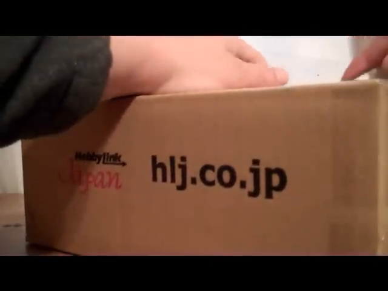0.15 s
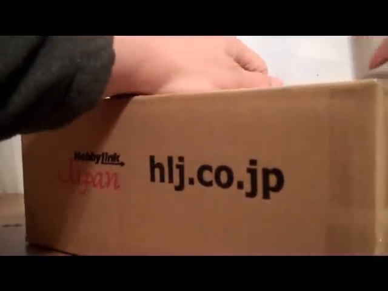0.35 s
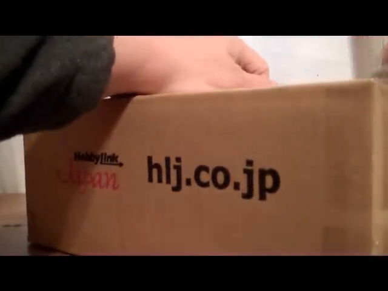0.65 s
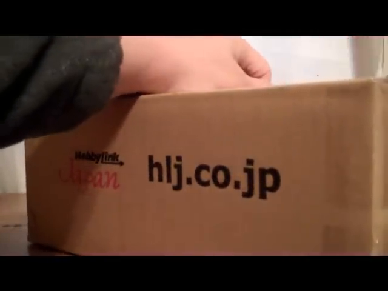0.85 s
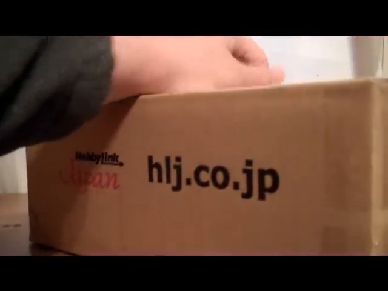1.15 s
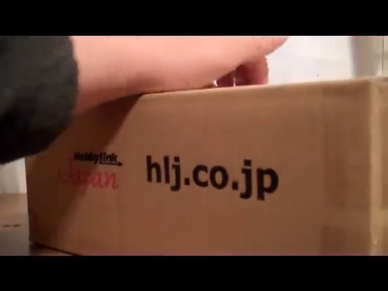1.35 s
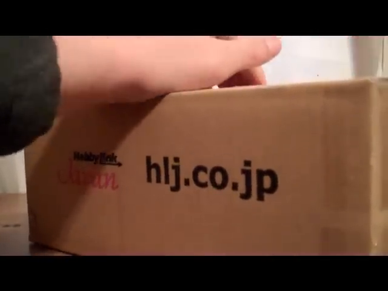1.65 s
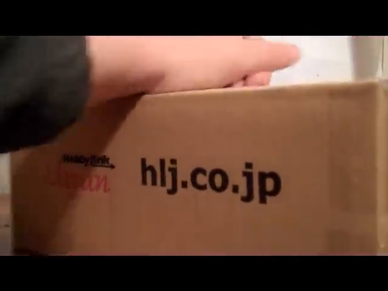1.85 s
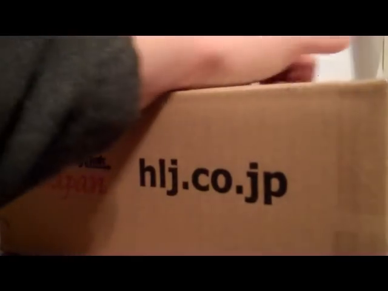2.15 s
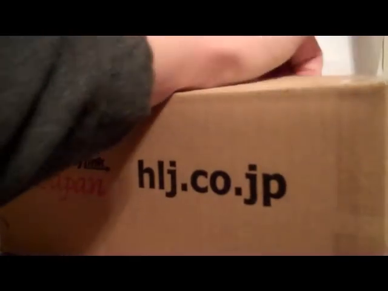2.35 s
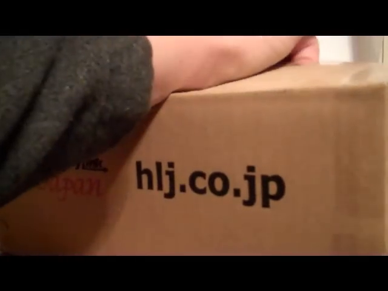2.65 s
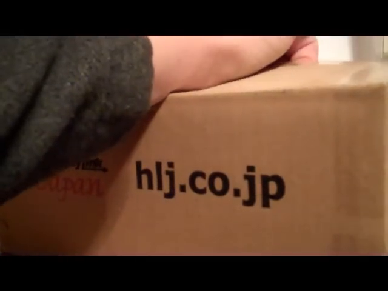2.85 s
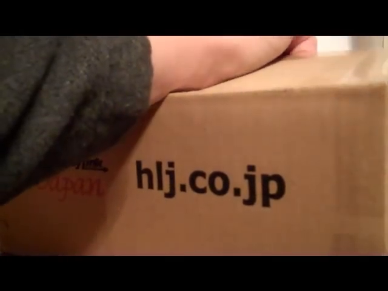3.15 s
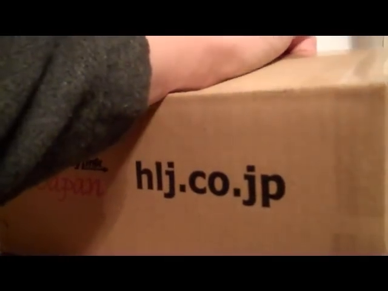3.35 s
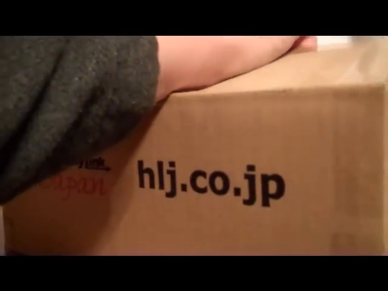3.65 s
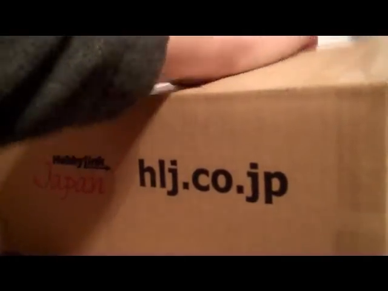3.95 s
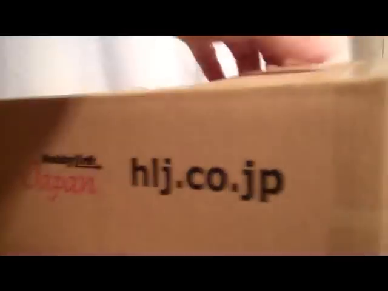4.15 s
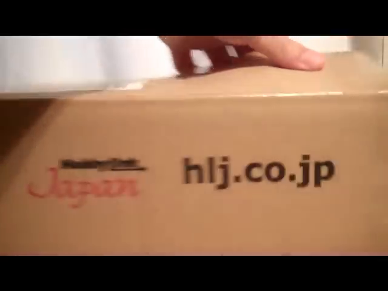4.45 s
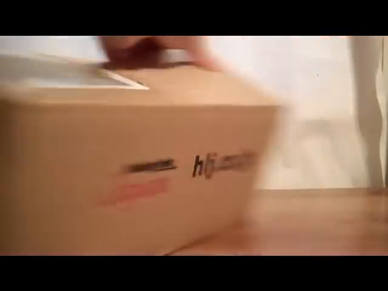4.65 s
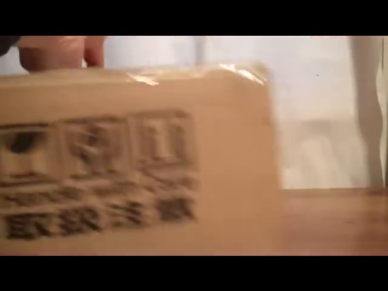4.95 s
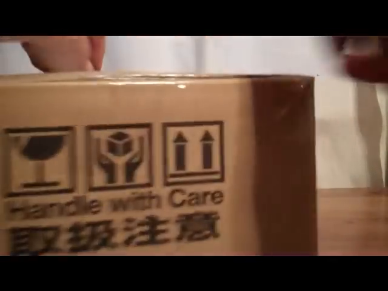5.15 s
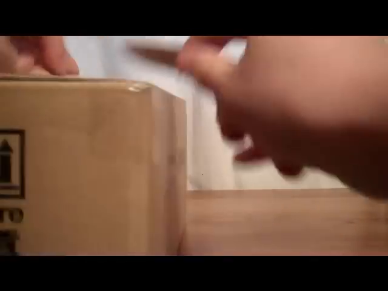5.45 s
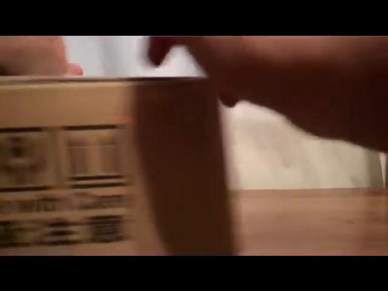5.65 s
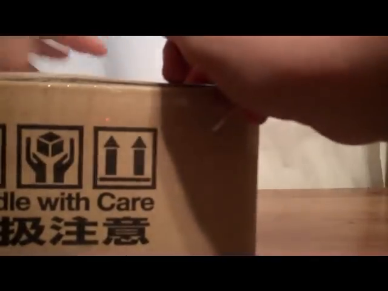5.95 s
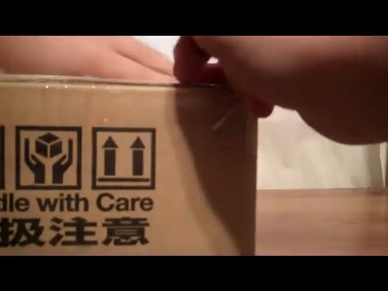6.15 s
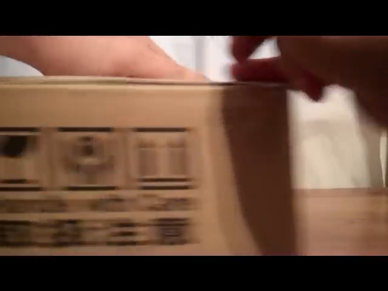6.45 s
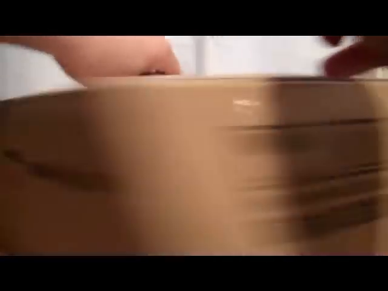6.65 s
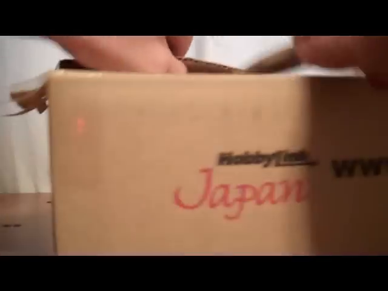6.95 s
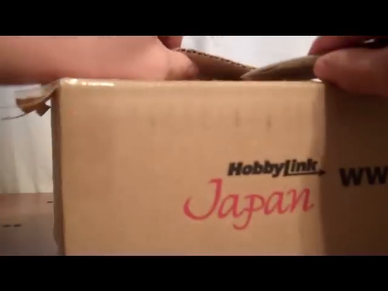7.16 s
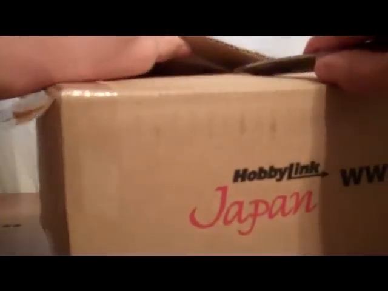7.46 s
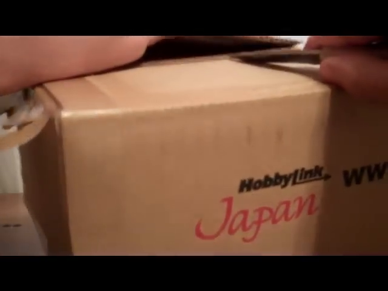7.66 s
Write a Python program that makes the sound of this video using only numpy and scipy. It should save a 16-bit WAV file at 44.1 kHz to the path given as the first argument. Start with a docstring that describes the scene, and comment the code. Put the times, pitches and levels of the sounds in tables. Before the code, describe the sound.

Close, dry cardboard handling: gritty hand rubs, sharp crackling tape snaps and rips, then a hollow box thump as the carton is turned.

```python
"""Hands slit, rub and peel tape on a cardboard box, then turn the box on a table, close to a small camera.
Rubbing is a dense rain of tiny random slips: a gritty hiss that also shakes the flaps, panels and cavity.
Tape snaps are cracks of noise that knock the box; bumps ring its air and panels with a short rattle.
One brief run of squeaks glides in partials; faint room noise lies behind. Two microphone ports listen."""
import sys
import numpy as np
from scipy import signal
from scipy.fft import rfft, irfft, next_fast_len
from scipy.io import wavfile
from scipy.ndimage import uniform_filter1d, map_coordinates

SR = 44100
rng = np.random.default_rng(int(sys.argv[2]) if len(sys.argv) > 2 else 0)


def waveform_to_disk(signal):
    """Save audio, clipped to [-1, 1], as 16-bit WAV at the path in sys.argv[1]."""
    frames = np.transpose(np.atleast_2d(signal))
    scaled = np.clip(frames, -1, 1) * 32767
    samples = np.round(scaled).astype(np.int16)
    wavfile.write(sys.argv[1], SR, samples)


N = 343912

# Resonances of the box. Each row: frequency in Hz, width in Hz at ring factor 1, relative level in dB.
# Taped flaps.
FLAP_MODES = [(1707, 302, -1), (2290, 365, 2.5), (2652, 237, 0.5), (2920, 382, -0.5), (3770, 570, -9.5)]
# Side panels, same columns.
PANEL_MODES = [(676, 140, -2), (869.5, 146, 7.5), (1147, 95, 3), (1356, 198, 7)]
# Air and floor of the box, same columns.
CAVITY_MODES = [(246, 127, 4), (134.5, 52, -15.5), (362.6, 127, 15)]


def amp(db):
    """Amplitude factor of a level in dB."""
    return 10 ** (np.asarray(db, float) / 20)


def evened(x):
    """Scales a signal to an RMS of 1."""
    return x / np.sqrt(np.mean(x ** 2) + 1e-20)


def read(points, hz):
    """Reads a spectral curve, straight between its points on a log-frequency axis."""
    f, value = np.transpose(points)
    return np.interp(np.log(hz + 1), np.log(f + 1), value)


def over_time(points):
    """Reads a curve of (seconds, value) at every sample."""
    return np.interp(np.arange(N) / SR, *np.transpose(points))


def shaped(x, gain):
    """Applies gain(Hz) to the whole spectrum."""
    size = next_fast_len(x.shape[-1])
    spectrum = rfft(x, size) * gain(np.fft.rfftfreq(size, 1 / SR))
    return irfft(spectrum, size)[..., :x.shape[-1]]


def wander(count, samples):
    """Slow random drift of RMS 1: noise averaged twice over a few samples."""
    noise = rng.standard_normal(count)
    return evened(uniform_filter1d(uniform_filter1d(noise, samples), samples))


def add(mix, s, sound):
    """Adds a sound to the mix from s seconds on."""
    part = mix[..., max(round(s * SR), 0):][..., :sound.shape[-1]]
    part += sound[..., :part.shape[-1]]


def ring(modes, slope_db=0., longer=0.64, size=3000):
    """Impulse response of decaying modes, peak 1; modes swing opposite ways by turns in list order; width sets
    the decay."""
    t = np.arange(size) / SR
    out = np.zeros(size)
    for k, (hz, width, db) in enumerate(modes):
        level = amp(db - slope_db * np.log2(hz / 300))
        decay = np.exp(-np.pi * width * t / longer)
        out += (-1) ** k * level * decay * np.sin(2 * np.pi * hz * t)
    return out / abs(out).max()


def pressure():
    """Each stroke rises, holds and falls; overlapping strokes add in power, in hiss, flap, panel, cavity."""
    # Strokes of hand, blade and tape; the long early one is a hand resting on the box almost throughout.
    # Each row: full strength from in seconds, held in seconds, seconds to rise 20 dB, seconds to fall 20 dB,
    # then surface hiss, flap buzz, panel drone and cavity rumble in dB.
    strokes = [(0.0, .05, .05, .05, -56, -57, -62, -59), (.01, 7.5, .05, .15, -62, -68, -75, -75),
               (.102, .065, .07, .045, -40, -46, -46, -51), (.285, .115, .05, .045, -37.5, -46, -53, -53),
               (.535, .028, .055, .026, -41, -49, -53, -60), (.69, .06, .06, .045, -31, -45, -50, -51),
               (.795, .015, .03, .035, -48, -60, -66, -66), (.862, .038, .035, .045, -40, -54, -58, -54),
               (1.036, .062, .027, .034, -38, -48, -52, -54), (1.171, .066, .045, .11, -49, -52, -54, -58),
               (1.385, .005, .22, .22, -36, -44, -49, -50), (1.49, .09, .11, .06, -46, -60, -60, -64),
               (1.924, .005, .16, .14, -28, -41, -46, -52), (2.14, .045, .12, .11, -26, -42, -47, -54),
               (2.36, .03, .4, .11, -43, -51, -57, -58), (2.436, .03, .09, .13, -34, -43, -41, -46),
               (2.572, .096, .13, .14, -36, -47, -52, -60), (2.971, .042, .21, .11, -45, -56, -57, -56),
               (3.075, .005, .065, .09, -26, -32, -30.5, -43), (3.11, .045, .05, .022, -37, -41, -38, -44),
               (3.227, .003, .05, .17, -41, -42.5, -39.5, -51),
               (3.405, .042, .035, .035, -25.5, -31, -31, -40),
               (3.606, .07, .28, .05, -38.5, -42, -43, -49), (3.695, .004, .012, .034, -19, -18, -25, -34),
               (3.8, .045, .11, .05, -52, -56, -58, -54), (3.862, .012, .012, .043, -27, -41, -44.5, -56),
               (4.081, .003, .17, .11, -33, -39, -43.5, -50), (4.225, .11, .04, .11, -40, -45, -48, -53),
               (4.392, .003, .17, .05, -36, -41, -48, -53), (4.427, .004, .03, .045, -27, -38, -50, -58),
               (4.46, .243, .09, .12, -32.5, -47, -51, -55),
               (4.867, .003, .125, .085, -33, -41.5, -46, -42), (4.95, .25, .11, .11, -44.5, -52, -52, -54),
               (5.288, .003, .17, .18, -33, -37, -41, -48), (5.52, .004, .04, .04, -41, -50, -48, -54),
               (5.378, .06, .05, .11, -42.5, -47, -46, -45),
               (5.569, .003, .19, .18, -38.5, -41.5, -48.5, -51.5),
               (5.685, .075, .21, .04, -41.5, -50, -51, -59), (5.82, .09, .06, .04, -50, -60, -60, -60),
               (5.935, .034, .04, .012, -45, -54.5, -52, -55), (6.03, .098, .012, .11, -46, -53, -50, -59),
               (6.188, .003, .12, .125, -33.5, -43, -47, -51.5),
               (6.294, .003, .21, .42, -41, -48, -50, -54), (6.485, .09, .11, .21, -36, -46, -45, -55),
               (6.697, .082, .19, .21, -29, -37, -42, -52), (6.83, .12, .11, .15, -35, -43, -52, -57),
               (7.0, .04, .11, .12, -41, -47, -44, -46), (7.21, .003, .29, .26, -43.5, -56, -51.5, -60),
               (7.355, .003, .11, .45, -51, -56, -57, -59), (7.738, .003, .022, .06, -63, -62, -73, -68)]
    edge_bend = 1.15  # above 1 the edges of a stroke round into a dome
    t = np.arange(0, N / SR + .002, .002)
    s, held, rise, fall, *dbs = np.transpose(strokes)[..., None]
    before = np.maximum(s - t, 0) / rise
    after = np.maximum(t - s - held, 0) / fall
    below_db = 20 * (before + after) ** edge_bend
    levels = [np.sqrt((amp(db - below_db) ** 2).sum(axis=0)) for db in dbs]
    return [np.interp(np.arange(N) / SR, t, level) for level in levels]


def slips(per_s, spread_db, clump_db):
    """Random stick-slip clicks of uneven size in clumps of a few ms; three paths with unrelated signs."""
    size = amp(spread_db * np.minimum(rng.exponential(1, N), 5))
    size = size * (rng.random(N) < per_s / SR)
    clumps = amp(clump_db * wander(N, 150))
    return evened(size * clumps * rng.choice([-1., 1.], (3, N)))


def rubbing():
    """Fine slips hiss on the surface; coarser slips drive flaps, panels and cavity; the colour wanders."""
    # Dry skin and blade on paper. Each row: frequency in Hz, relative density in dB per Hz.
    hiss_curve = [(1470, -41), (2500, -14.5), (2890, -14.5), (3970, -9), (4320, -9), (4750, -7),
                  (5180, -8.5), (6470, -3.0), (8040, -2.0), (10700, -20.5), (14000, -24.5), (14500, -92)]
    # Glue crackles most while tape is peeled. Each row: time in seconds, strength of the ticks as a factor.
    peel = [(0, .2), (2.25, 0.12), (2.35, 0.49), (3.7, 0.72), (4.0, 0.17), (7.3, 0.23), (7.6, 0.63),
            (7.8, 1)]
    # Top treble of the rubbing, fading in from 9 to 11 kHz. Each row: time in seconds, gain in dB.
    sheen = [(0, -4), (.9, -1.5), (1.7, -1), (2.8, 0.5), (4.6, 2), (5.2, 0.5), (6, 5), (7.1, -1.5),
             (7.8, 5)]
    hiss, flap, panel, cavity = pressure()
    fine = slips(per_s=16000, spread_db=1.0, clump_db=1.2)
    coarse = slips(per_s=5000, spread_db=0.0, clump_db=2.0)

    # Fibres and glue let go now and then; each tick lasts about 1 ms.
    ticks = slips(per_s=150, spread_db=3.5, clump_db=5.0) * over_time(peel)
    burst = rng.standard_normal((3, 60)) * np.exp(-np.arange(60) / 13.6) / 3
    fine = fine + signal.oaconvolve(ticks, burst, axes=1)[:, :N]
    coarse = coarse + 0.6 * ticks

    out = hiss * evened(shaped(fine, lambda hz: amp(read(hiss_curve, hz))))
    for level, modes in ((flap, FLAP_MODES), (panel, PANEL_MODES), (cavity, CAVITY_MODES)):
        shaken = signal.oaconvolve(coarse, ring(modes)[None], axes=1)[:, :N]
        out += level * evened(shaken)

    hz, t, z = signal.stft(out, SR, nperseg=256)
    top = np.clip((hz - 9000) / 2000, 0, 1)
    z = z * amp(np.outer(top, np.interp(t, *np.transpose(sheen))))
    # Patches of time and frequency drift up and down together in all three paths.
    patches = uniform_filter1d(rng.standard_normal(z.shape[1:]), 5, axis=0)
    patches = evened(uniform_filter1d(patches, 25, axis=1))
    return signal.istft(z * amp(1.7 * patches), nperseg=256)[1][:, :N]


def snaps():
    """Tape lets go in a short crack, bright or dull, with a rattling tail; it also knocks flaps and panels."""
    # Tape snaps. Each row: start in seconds, crack peak in dB, brightness in dB per octave,
    # flap level in dB, panel level in dB.
    events = [(0.122, -24, 3, -30, -40), (0.1518, -16.5, 3, -20, -49), (.167, -11, -1, -16, -54),
              (0.4168, -28, 7, -40.5, -48), (.4443, -51, 0, -42, -38.5), (.624, -28, -3, -50, -41),
              (.668, -17, -6, -35, -51), (.814, -29, 6, -50, -56), (0.8371, -27, -3, -38, -67),
              (.9855, -28.5, -7, -46, -39), (1.2065, -24.5, -18, -30, -39), (1.7402, -27, -2, -45, -35),
              (1.7587, -15, -3.5, -46, -56), (1.933, -12, 2, -36, -36), (1.9422, -17, -5, -21, -25),
              (1.982, -0.5, -3.5, -28, -11), (1.9916, -24, 0, -23, -21), (2.0042, -7.5, -2.5, -14, -24),
              (2.242, -18, -1, -41, -46), (2.2862, -24.5, -7, -46, -34), (2.306, -23, -3, -48.5, -56.5),
              (2.3421, -8, 6.5, -14, -50), (2.415, -17, 10, -37, -46), (2.4404, -19, 2, -36, -37),
              (2.4511, -1.5, 4, -4, -11.5), (2.5375, -16.5, 13, -38, -49), (2.559, -12.5, 11, -16.5, -25.5),
              (2.585, -17, 3, -38, -48), (2.623, -19, 10, -43, -47), (2.775, -18, 7.5, -54, -66),
              (2.8712, -32, 6, -59, -65), (2.954, -27, 15, -23, -58.5), (3.022, -29, 4, -40, -48),
              (3.0402, -21, 4.5, -38.5, -46), (3.0635, -9, 15, -13, -39), (3.072, 0, -1, -0.5, -23),
              (3.1537, -29, 12, -39, -28), (3.1993, -29, 10, -38.5, -44), (3.2168, -11.5, 10, -15, -22),
              (3.38, -38, 8, -43, -36), (3.3955, -12.5, 10, -39, -30), (3.401, -17, 4, -21, -19),
              (3.408, -20, 5, -30, -16), (3.4296, -7.5, 7, -28, -10.5), (3.5125, -23, -6, -42, -26.5),
              (3.5641, -21.5, -17, -33.5, -20), (3.6442, -16, 7, -30, -29), (3.691, -12, 6, -32, -36),
              (3.7, -6, 5, -15, -11), (3.7121, -20, -6, -37, -24), (3.7164, -18, -3, -38, -36),
              (3.8593, -20, -22, -47, -53), (3.8685, -33, 14, -14, -52), (3.938, -21, 10, -49, -54),
              (4.15, -35, 0, -49, -48), (4.3076, -23, 4, -47, -48), (4.4261, -9.5, -1.5, -14.5, -36),
              (4.4781, -12, 6, -39, -53), (4.704, -16.5, 9, -44, -48), (4.8527, -16, 11, -28, -21),
              (4.9272, -22, -5, -46, -29), (5.3709, -18, 2, -7, -9), (5.674, -22, -2, -51, -29),
              (6.197, -15.5, -12.5, -40, -25), (6.641, -21, 12, -41, -28), (6.771, -15, 21, -18, -48),
              (6.99, -28, -2, -32, -45), (7.3426, -50.5, 1, -32, -33), (7.356, -28.5, 3, -32, -48),
              (7.416, -25.5, -4, -24, -63), (7.4904, -29.5, 20, -38, -45), (7.518, -21, 4.5, -28, -61),
              (7.552, -41, 6, -46, -68), (7.645, -43, 12, -67, -65), (7.6744, -47, 6, -64, -65),
              (7.7247, -25.5, -6, -24.5, -66), (7.7474, -45, 4, -60, -64)]
    # Colour of a crack. Each row: frequency in Hz, relative density in dB per Hz.
    crack_curve = [(1760, -19.5), (3000, -8.5), (3770, -10), (4350, -7.5), (5050, -5.5), (7010, -1),
                   (7910, -0.5), (9660, -18.5), (14100, -29.5), (16500, -83)]
    rattle_t60_s, shrink_per_db = 0.025, 0.03  # tail of a -18 dB crack; harder snaps rattle shorter
    lead = 64  # samples of room ahead of the crack for the colouring filter
    out, t = np.zeros((3, N)), np.arange(3000) / SR
    noise = rng.standard_normal((len(events), 3, len(t)))
    sharp = amp(-60 * t / .005)
    faint_tail = amp(-19.5 - 60 * t / 0.097)
    flap = np.gradient(ring(FLAP_MODES))  # small flaps radiate little bass
    flap, panel = flap / abs(flap).max(), ring(PANEL_MODES)
    for (s, crack_db, tilt_db, flap_db, panel_db), n in zip(events, noise):
        t60 = rattle_t60_s * np.exp(-shrink_per_db * (crack_db + 18))
        fade = sharp + amp(-5 - 60 * t / t60) + faint_tail

        def colour(hz):
            octaves = np.log2(np.clip(hz, 3500, 12000) / 6000)
            return amp(read(crack_curve, hz) + tilt_db * octaves)

        crack = shaped(np.pad(n * fade, ((0, 0), (lead, 0))), colour)
        crack = crack / abs(crack[:, :200]).max(axis=1, keepdims=True)
        add(out, s - lead / SR, amp(crack_db) * crack)

        blow = n[:, :60] * amp(-60 * t[:60] / 0.00067)
        body = amp(flap_db) * flap + amp(panel_db) * panel
        knock = signal.fftconvolve(blow, body[None], axes=1)
        knock = knock / abs(knock).max(axis=1, keepdims=True)
        add(out, s, (amp(flap_db) + amp(panel_db)) * 0.49 * knock)
    return out


def bumps():
    """A soft blow, with loose contents rattling for a moment, rings the cavity and the panels."""
    # Bumps of hand and table on the box. Each row: start in seconds, cavity level in dB, panel level in dB,
    # deepness of the cavity in dB per octave down, ring factor (above 1 rings longer).
    events = [(0.114, -34.5, -39.5, -18, 4.1), (0.25, -35.5, -62.5, -8, 0.79), (0.837, -39.5, -35, 2, 1.4),
              (1.009, -34, -41, -8, 1.1), (1.386, -25.5, -24.5, 25, 1.2), (1.982, -15.5, -51, 16, 0.73),
              (2.338, -36.5, -53.5, -28.5, 3.9), (2.411, -37, -37, -19.5, 2.1),
              (2.448, -30.5, -39, -3, 1.6), (2.554, -27.5, -25, -2, 1.4), (2.966, -31.5, -24, -31, 1.9),
              (3.069, -24, -12, 15, 0.75), (3.396, -56, -15, 20, 0.97), (3.712, -14, -11, 5, 1.7),
              (4.077, -38.5, -52, 0, 2.3), (4.189, -41, -41, 16, 1.9), (4.538, -39, -39, 21, 0.67),
              (4.852, -38, -23.5, 7, 0.86), (4.873, -28.5, -44, 31, 1.2), (4.925, -18.5, -28, 22, 1.6),
              (5.043, -31, -23.5, 29, 0.39), (5.37, -6.5, -5.5, 13.5, 2.24), (5.3754, -11.5, -13.5, 1, 1.3),
              (5.453, -52, -56, 4, 1.3), (5.511, -58, -30, 0, 0.7), (5.56, -41, -25, 20, 0.65),
              (5.756, -38.5, -35, 29, 1.1), (6.025, -41, -56, 44, 3.6), (6.165, -35.5, -29, -6, 1.615),
              (6.239, -33.5, -32, -11, 3.6), (6.467, -34, -57, 21, 2.5), (7.009, -22, -34, 12.5, 3.3),
              (7.031, -31, -45, 5, 2.1), (7.351, -40, -41, -23, 0.7)]
    out, t = np.zeros(N), np.arange(4000) / SR
    rattles = rng.standard_normal((len(events), len(t))) * amp(-33.5 - 60 * t / 0.097)
    soft = np.pad(np.hanning(30) / 15, (0, len(t) - 30))
    for (s, cavity_db, panel_db, deep_db, longer), rattle in zip(events, rattles):
        cavity = amp(cavity_db) * ring(CAVITY_MODES, deep_db, longer)
        panel = amp(panel_db) * ring(PANEL_MODES, 0, longer)
        add(out, s, signal.fftconvolve(soft + rattle, cavity + panel))
    return signal.lfilter(*signal.butter(1, 90, "high", fs=SR), out)  # a small box radiates no deep bass


def squeaks():
    """Cardboard slipping regularly: a gliding stack of partials that wobbles in pitch and level."""
    # Each row: start in seconds, length in seconds, start pitch in Hz, end pitch in Hz,
    # relative level of partials 1, 2 and 3 in dB.
    events = [(6.669, 0.013, 732.8, 752.9, -36, -42, -53.5), (6.713, 0.025, 2300, 2630, -32, -19.5, -47),
              (6.74, 0.0093, 2780, 2580, -35, -24, -25), (6.762, 0.012, 2020, 2050, -34, -33, -45),
              (6.78, 0.0238, 2430, 2250, -37, -39, -53)]
    out = np.zeros(N)
    for s, length, hz0, hz1, *dbs in events:
        count = round(length * SR)
        wobble = wander(count, 40)
        pitch = np.linspace(hz0, hz1, count) * (1 + 0.031 * wobble)
        turns = np.cumsum(pitch) / SR
        tone = sum(amp(db) * np.sin(2 * np.pi * (k + 1) * turns) for k, db in enumerate(dbs))
        fade = signal.windows.tukey(count, .08) * np.hanning(2 * count)[count:] ** 0.23
        add(out, s, np.sqrt(2) * tone * fade * amp(1.7 * wobble[::-1]))
    return out


def room_noise():
    """Steady noise of the place behind the box, coloured by a fixed curve, on three unrelated paths."""
    # Each row: frequency in Hz, relative density in dB per Hz.
    room_curve = [(12, -52), (20, -17), (101, -18), (270, 3.5), (668, -9), (1360, -2.5), (1840, 1.5),
                  (2170, -27), (3370, -17), (5360, -27.0), (8090, -31.0), (14000, -22), (14500, -90)]
    noise = shaped(rng.standard_normal((3, N)), lambda hz: amp(read(room_curve, hz)))
    return amp(-61) * evened(noise)


def ports(paths):
    """Bass reaches both ports alike; treble reaches each by its own path round hands, box and camera."""
    # Likeness of the two ports. Each row: frequency in Hz, shared part of the power from 0 to 1.
    likeness = [(60, 0.47), (150, 0.9), (400, 0.95), (1200, 0.94), (2200, 0.69), (3500, 0.7), (5500, 0.083),
                (9000, 0.12)]
    # The hands move to the middle. Each row: time in seconds, lag of the left port in samples.
    left_lag = [(0, 2.07), (4.6, 1.44), (5.1, 0.067), (7.8, 0.047)]
    direct = shaped(paths[0], lambda hz: np.sqrt(read(likeness, hz)))
    arrival = np.arange(N) - over_time(left_lag)
    late = map_coordinates(direct, [arrival], order=3, mode="nearest")
    own = shaped(paths[1:], lambda hz: np.sqrt(1 - read(likeness, hz)))
    return np.array([late, direct]) + own


def scene():
    """Rubbing, snaps and room pass the ports; bumps reach both alike, squeaks both with the same sign, the left
    1 dB louder."""
    around = ports(rubbing() + snaps() + room_noise())
    return around + bumps() + squeaks() * amp(0) * np.array([[1.], [1.]]) * amp([[.5], [-.5]])


def record(dry):
    """The microphone drops the deep bass, the right port is duller, loud peaks flatten; then the band limit."""
    # Balance of the ports. Each row: frequency in Hz, left over right in dB.
    balance = [(150, 0.5), (3300, 0.5), (5500, -2), (7000, 2), (9000, 13.5), (15000, 13.5)]

    def port_gains(hz):
        left_over_right = amp(read(balance, hz))
        return np.array([left_over_right, np.ones_like(hz)]) * 2 / (1 + left_over_right)

    both = shaped(dry, port_gains)
    both = signal.sosfilt(signal.butter(2, 110, "high", fs=SR, output="sos"), both)
    ceiling = .65
    both = ceiling * np.tanh(both / ceiling)
    band_limit = signal.firwin(511, 16500, window=("kaiser", 11), fs=SR)  # nothing above 16.5 kHz
    return signal.oaconvolve(both, band_limit[None], "same")


dry = scene()
out = record(dry)
waveform_to_disk(out)
```